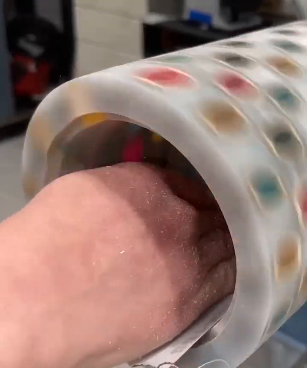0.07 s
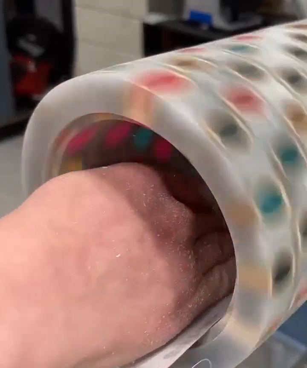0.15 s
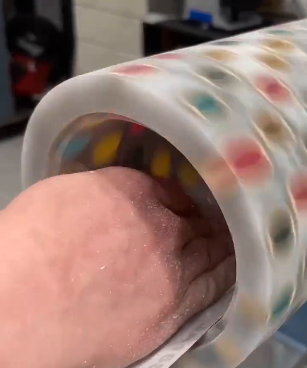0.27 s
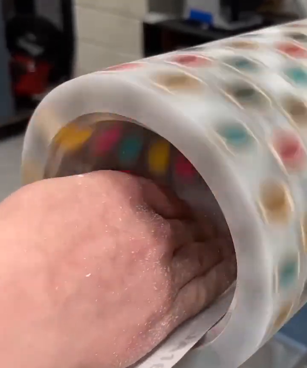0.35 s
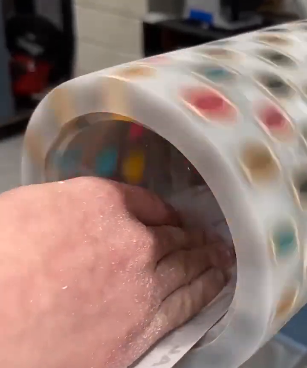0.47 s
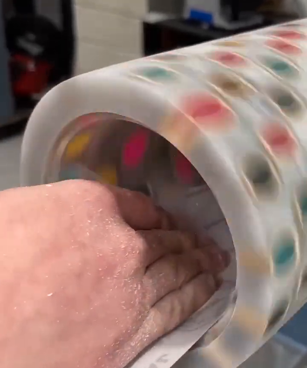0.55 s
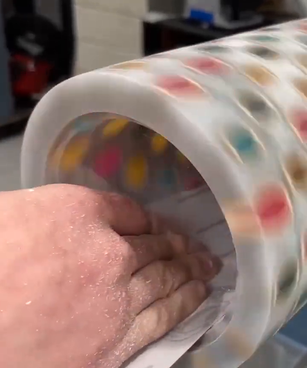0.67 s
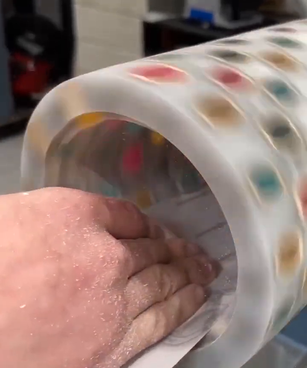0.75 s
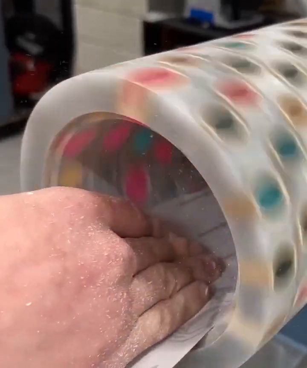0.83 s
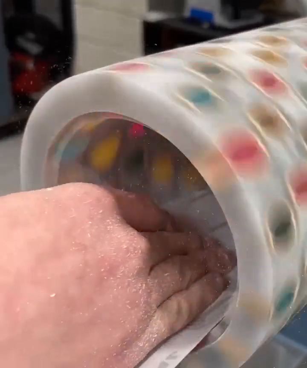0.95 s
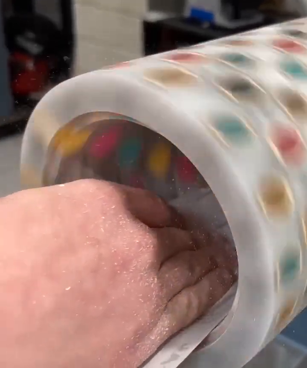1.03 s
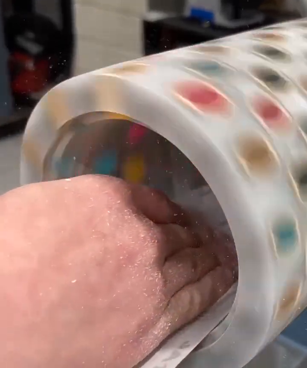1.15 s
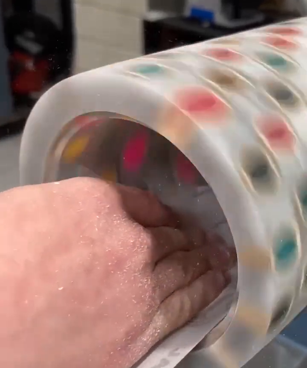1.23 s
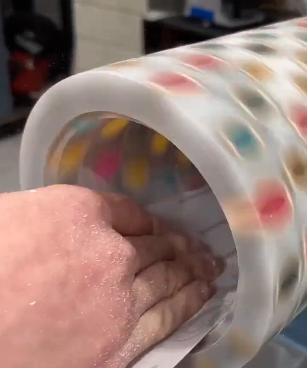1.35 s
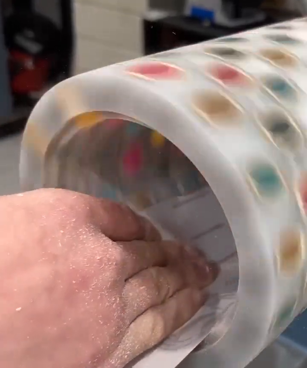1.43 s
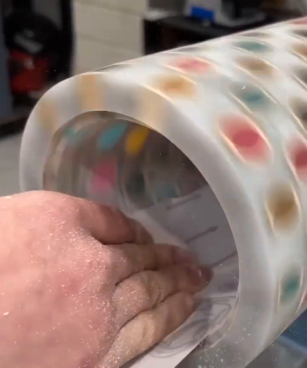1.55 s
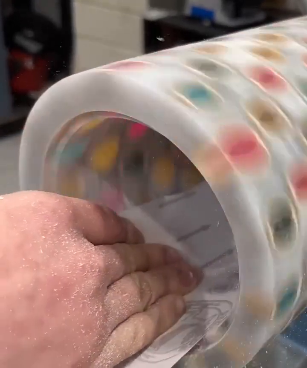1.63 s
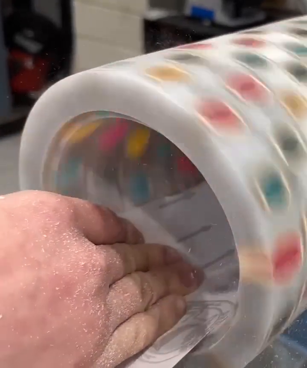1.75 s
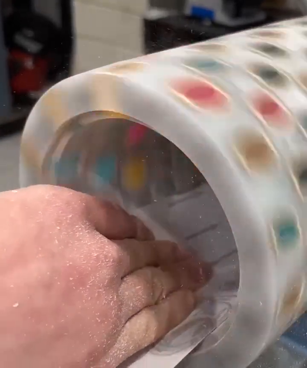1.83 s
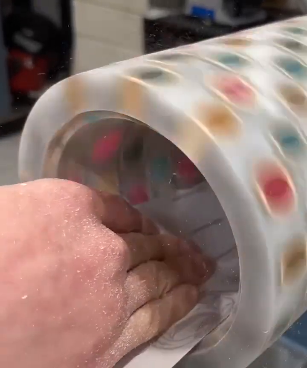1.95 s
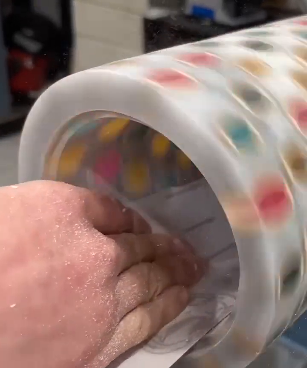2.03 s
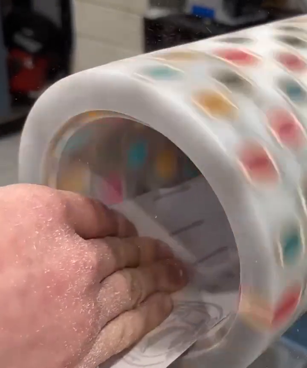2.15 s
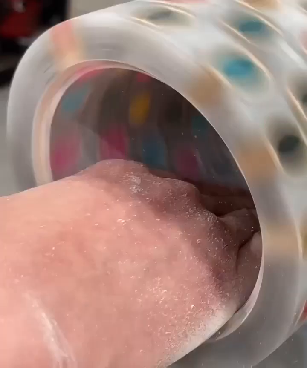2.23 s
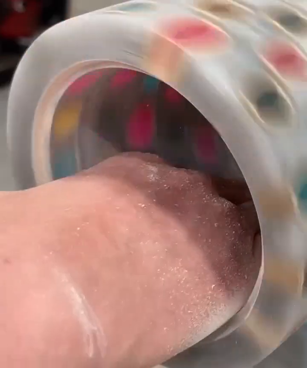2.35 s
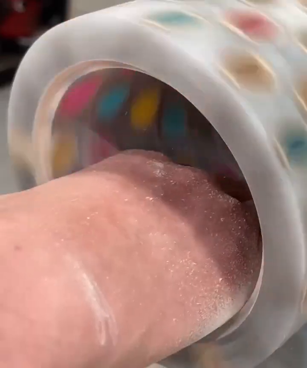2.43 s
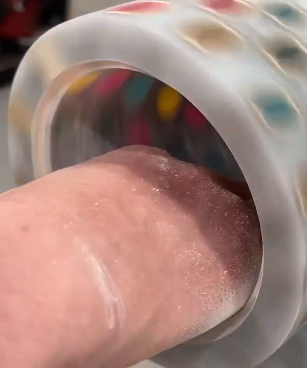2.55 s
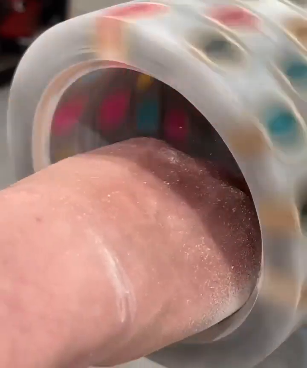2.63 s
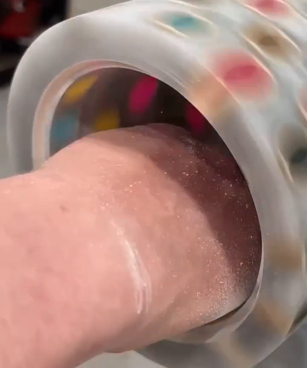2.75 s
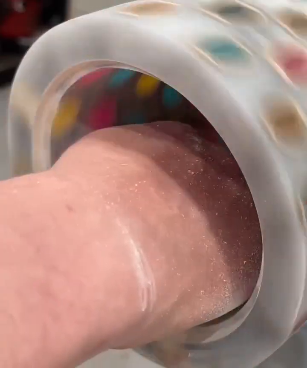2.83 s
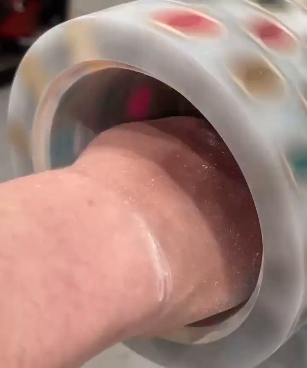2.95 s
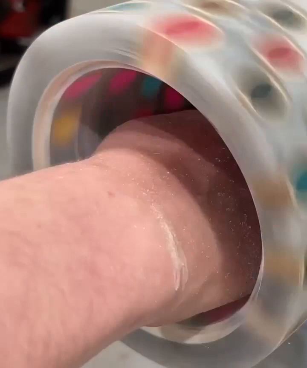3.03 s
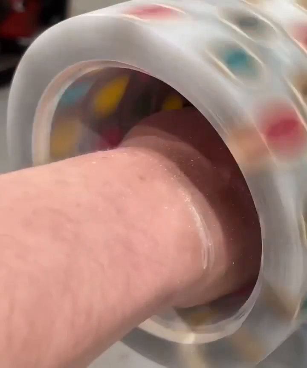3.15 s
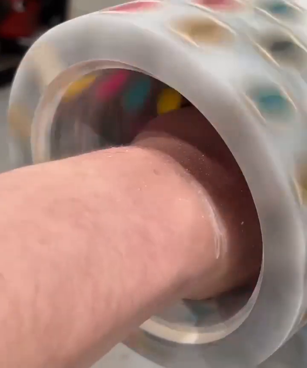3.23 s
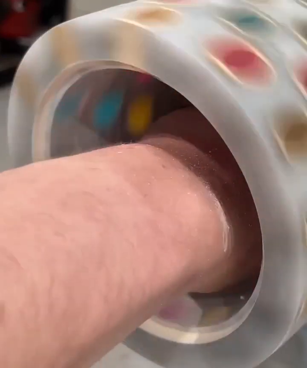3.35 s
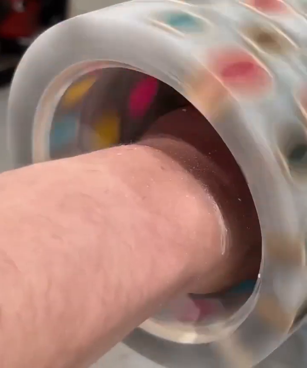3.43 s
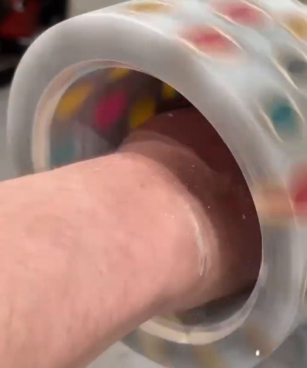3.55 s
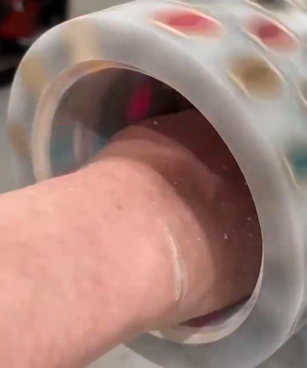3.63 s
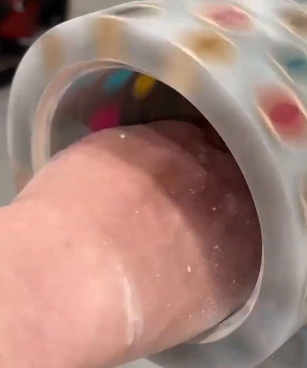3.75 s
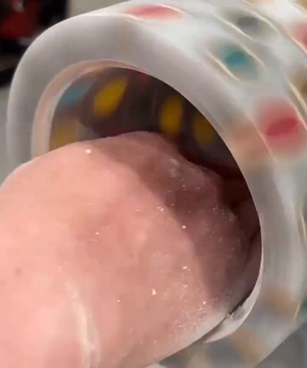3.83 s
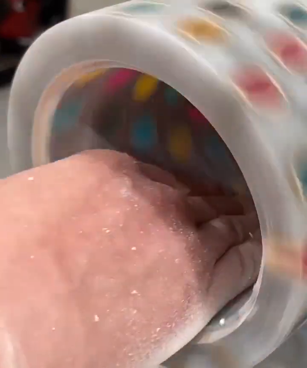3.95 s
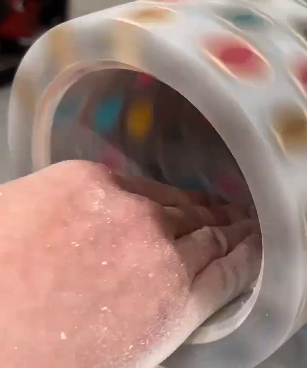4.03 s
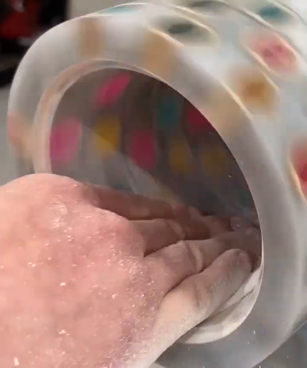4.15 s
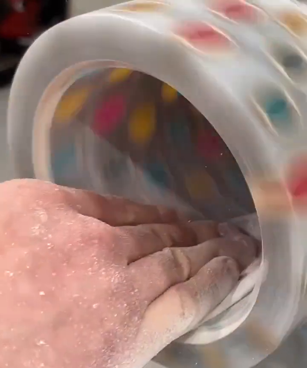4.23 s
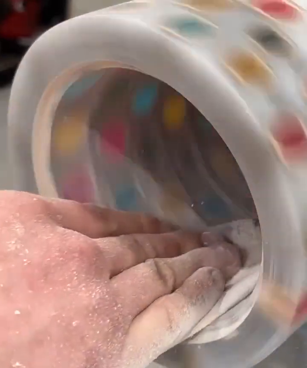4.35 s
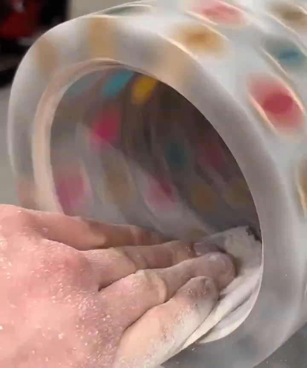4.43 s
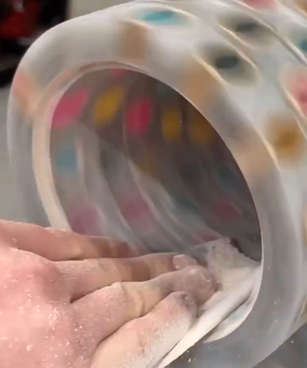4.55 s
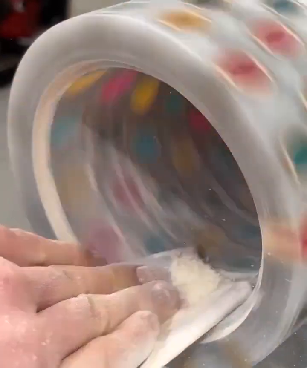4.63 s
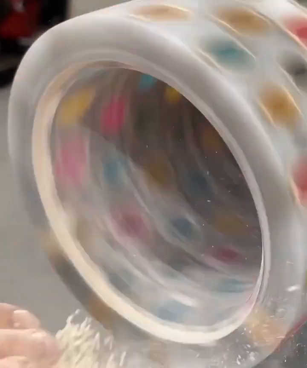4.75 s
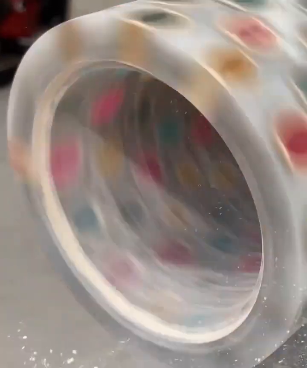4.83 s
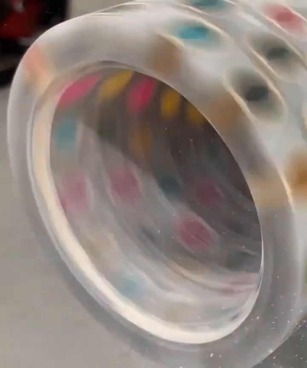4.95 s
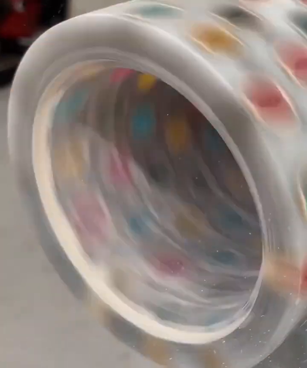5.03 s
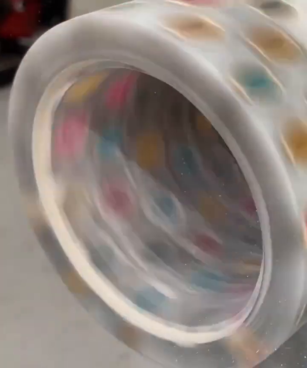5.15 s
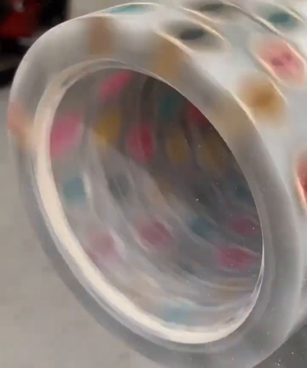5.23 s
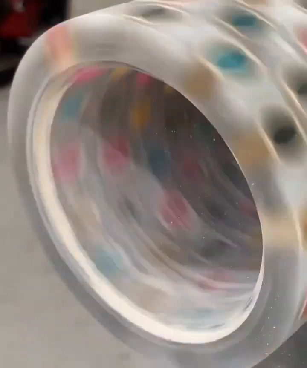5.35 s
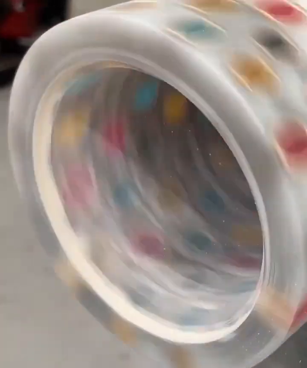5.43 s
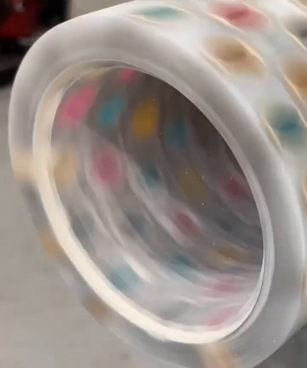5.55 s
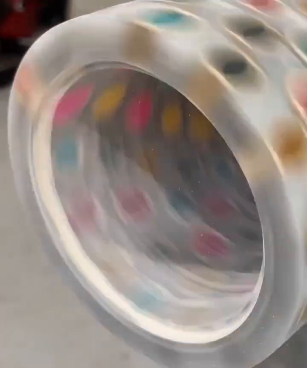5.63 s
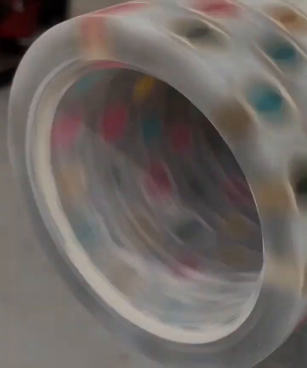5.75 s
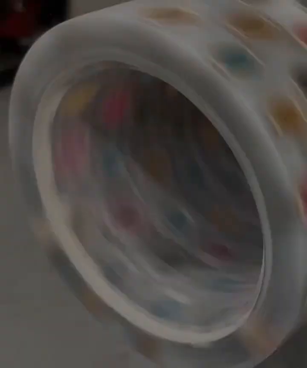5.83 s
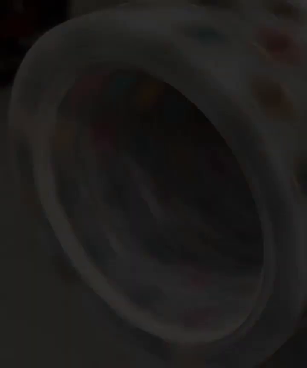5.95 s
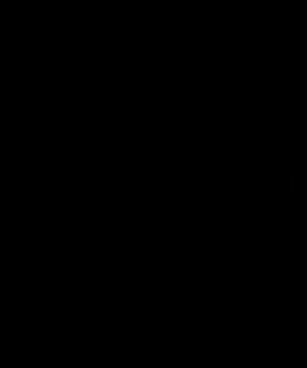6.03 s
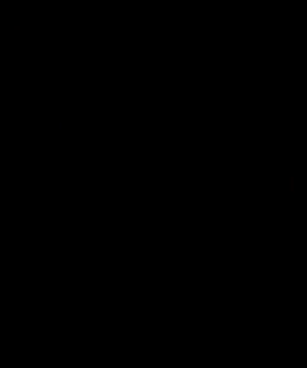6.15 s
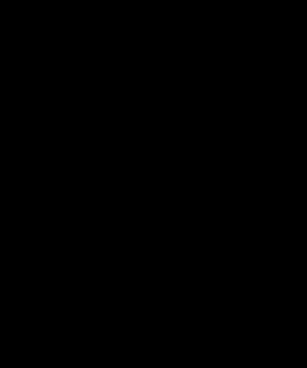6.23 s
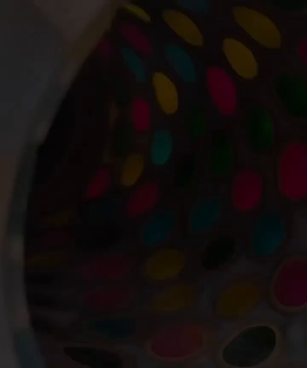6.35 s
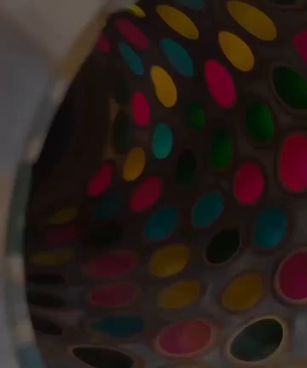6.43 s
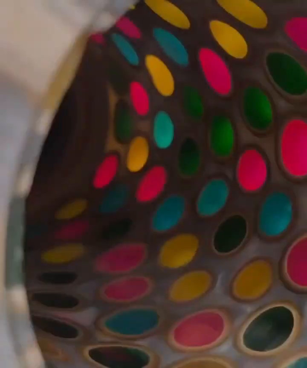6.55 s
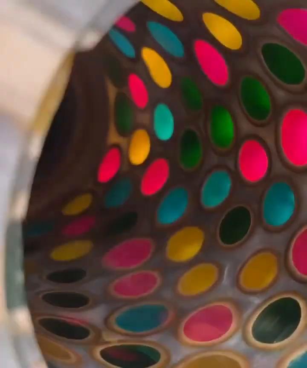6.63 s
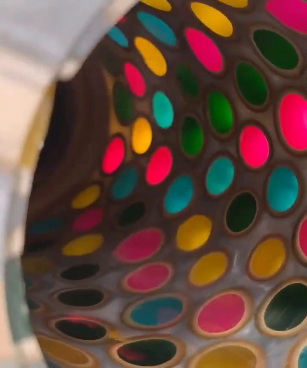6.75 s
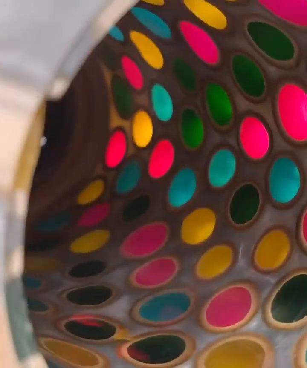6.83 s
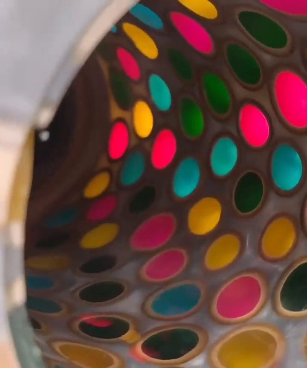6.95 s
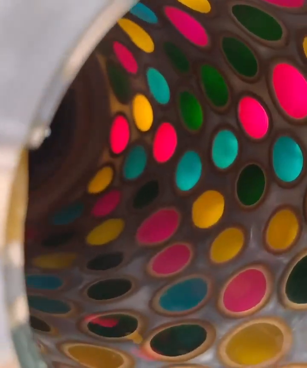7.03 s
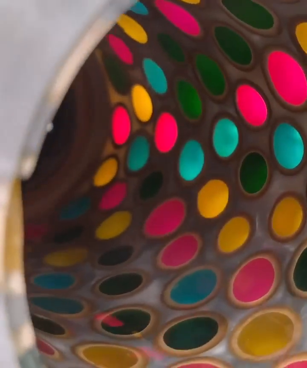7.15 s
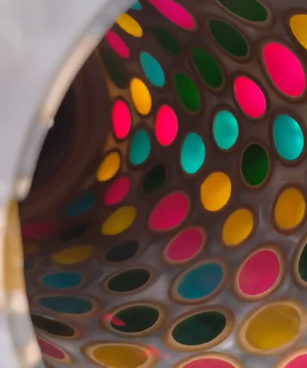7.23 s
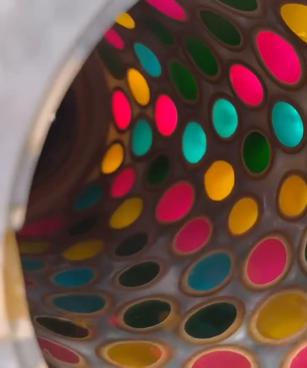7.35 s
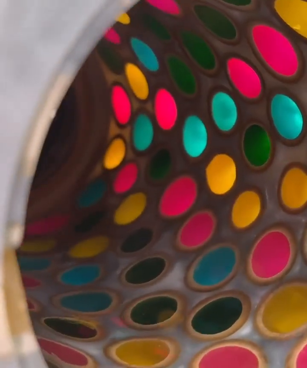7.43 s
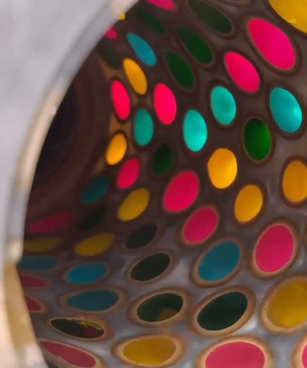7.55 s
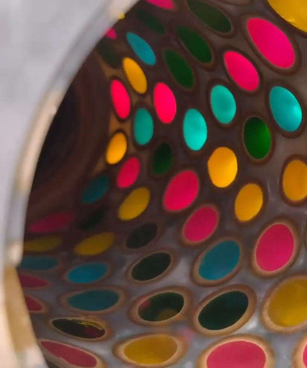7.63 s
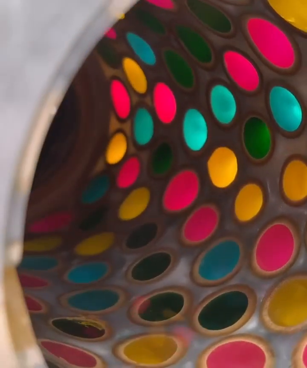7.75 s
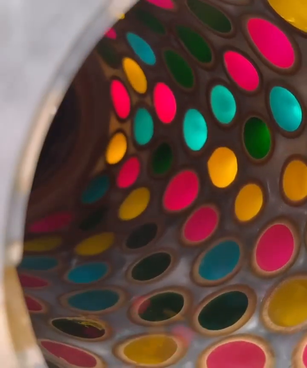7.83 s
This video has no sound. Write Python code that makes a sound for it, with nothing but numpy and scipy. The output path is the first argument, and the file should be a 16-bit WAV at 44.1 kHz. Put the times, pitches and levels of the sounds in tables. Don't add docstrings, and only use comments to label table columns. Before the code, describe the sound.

In a workshop, a hand rubs sandpaper inside a spinning hollow tube: continuous bright gritty hiss, shifting airy resonance, low wall ringing and spindle thrum. After nearly five seconds the paper snaps off the rim and the hiss cuts out. Motor hum and thin whine continue with soft rustles and ticks, then fade to room murmur and a faint far machine tone. Close stereo microphone.

```python
import sys
import numpy as np
from scipy import signal
from scipy.fft import rfft, irfft, next_fast_len
from scipy.io import wavfile
from scipy.ndimage import uniform_filter1d, map_coordinates

SR = 44100
rng = np.random.default_rng(int(sys.argv[2]) if len(sys.argv) > 2 else 0)


def put_to_file(sound):
    columns = np.atleast_2d(sound).T
    safe = np.clip(columns, -1, 1)
    whole_steps = np.round(safe * 32767)
    wavfile.write(sys.argv[1], SR, whole_steps.astype(np.int16))


def invert_db(x):
    u = np.asarray(x, float) / 20
    return 10 ** u


N = 347489

# (time [s], peak level [dB], frequency [Hz])
TICKS = [(5.341, -38, 4000), (5.4655, -33, 4500), (5.16, -40, 75), (5.185, -40, 70), (4.668, -38, 300),
         (4.698, -33, 330), (4.714, -33, 320), (4.728, -33, 300), (4.7445, -31, 340), (4.7563, -35, 340),
         (4.768, -38, 340), (4.66, -38, 900), (4.68, -37, 880), (4.698, -32, 830), (4.724, -33, 810),
         (4.74, -34, 900), (4.738, -36, 180), (4.738, -38, 480), (4.986, -47, 840), (4.998, -44, 890),
         (4.986, -46, 510), (5.012, -45, 760), (5.022, -45, 480), (5.026, -47, 720), (6.0, -50, 1150),
         (6.05, -45, 70), (6.43, -50, 60), (7.62, -52, 55), (6.093, -46, 4000), (6.175, -50, 4000),
         (6.258, -47, 4000), (6.298, -45, 4000), (6.32, -49, 4000), (6.378, -51, 4000)]
# (frequency [Hz], likeness [0..1])
ALIKE = [(60, .998), (150, .93), (290, .94), (480, .8), (800, .62), (1600, .25), (2300, .25), (2700, .62),
         (3050, .15), (3500, .2), (4300, .74), (5100, .76), (6300, .55), (7900, .7), (9800, .2),
         (11400, .4), (11900, .82), (12800, .78), (13500, .4), (15500, .7)]
# (frequency [Hz], likeness [0..1])
DIFFUSE = [(60, .998), (130, .95), (300, .75), (480, .42), (900, .15), (1400, .1), (15000, .1)]
# (frequency [Hz], left over right [dB])
SHELVES = [(2000, 0), (3500, 1.5), (5300, 6), (7000, 4), (8500, 0)]
# (start time [s], motor level [dB], far tone level [dB], left lag of far tone [samples])
SHOTS = [
    (0, -7, -65, -26),
    (2.28, 2, -57.5, -20),
    (4.78, 0, -54.5, -11.5),
    (6.43, -1, -53.5, 9.5),
]
LIFT_S = 4.735


def unit(x):
    return x / np.sqrt(np.mean(x ** 2) + 1e-20)


def along(points, hz):
    f, v = np.transpose(points)
    return np.interp(np.log(hz + 1), np.log(f + 1), v)


def curves(rows):
    s, *cols = np.transpose(rows)
    return [np.interp(np.arange(N) / SR, s, c) for c in cols]


def held(rows, glide_s):
    s, *cols = np.transpose(rows)
    row = np.searchsorted(s[1:], np.arange(N) / SR)
    return [uniform_filter1d(c[row], round(glide_s * SR), mode="nearest") for c in cols]


def swells(rows):
    t = np.arange(N) / SR
    return sum(db * np.exp(-((t - s) / half) ** 2) for s, db, half in rows)


def ramp(start, takes):
    return np.clip((np.arange(N) / SR - start) / takes, 0, 1)


def wobble(rate):
    return map_coordinates(rng.standard_normal(int(N * rate / SR) + 4), [np.arange(N) * rate / SR])


def filtered(x, response):
    m = next_fast_len(N + 8192)
    return irfft(rfft(x, m) * response(np.fft.rfftfreq(m, 1 / SR)), m)[..., :N]


def colour(spectrum):
    return lambda hz: invert_db(along(spectrum, hz)) * (hz > spectrum[0][0]) * (hz < spectrum[-1][0])


def modes(table):
    def response(f):
        return sum(invert_db(db) * (1j * f * w / (c * c - f * f + 1j * f * w)) ** 2 for c, w, db in table)
    return response


def noise(patchy_db, grain_db=0):
    z = signal.stft(rng.standard_normal((2, N)), nperseg=512)[2]
    field = uniform_filter1d(rng.standard_normal(z.shape[1:]), size=5, axis=0)
    field = uniform_filter1d(field, size=10, axis=1)
    pair = signal.istft(z * invert_db(patchy_db * unit(field)), nperseg=512)[1][:, :N]
    return pair * invert_db(grain_db * wobble(900))


def ports(pair, response, alike, near=0, lean=None):
    # (frequency [Hz], left lead [rad])
    lead = [(200, 0), (340, .1), (600, .7), (1000, 1.1), (1500, 1.2), (2700, 3), (4200, 6.7), (5300, 6.9),
            (6300, 6.9), (7600, 9.4), (8200, 9.4), (8900, 7.2), (11300, 6.2), (13500, 6.4), (14500, 7.1),
            (15300, 9.4)]
    # (frequency [Hz], left over right [dB])
    sideways = [(100, 0), (290, 1.3), (400, 2), (800, 7.5), (2100, 9.5), (2700, 6), (3200, 10), (3700, 10),
                (4300, 1.5), (5100, 1.5), (6000, 3.5), (8000, .5), (12000, 0)]
    m = next_fast_len(N + 8192)
    hz = np.fft.rfftfreq(m, 1 / SR)
    turn = np.arccos(np.clip(along(alike, hz), 0, 1)) / 2
    mid, side = rfft(pair, m) * (response(hz) * [np.cos(turn), np.sin(turn)])
    if lean is None:
        offset = invert_db(near * along(sideways, hz) / 2) * np.exp(.5j * near * along(lead, hz))
    else:
        offset = invert_db(near * along(lean, hz) / 2)
    both = irfft(np.array([(mid + side) * offset, (mid - side) / offset]), m)[:, :N]
    return both / np.sqrt(np.mean(both.mean(0) ** 2))


def tones(lines, drift_hz, waver_db):
    out = 0
    for hz, db in lines:
        level = np.sqrt(2) * invert_db(db + waver_db * wobble(29))
        phase = 2 * np.pi * np.cumsum(hz + drift_hz * wobble(9)) / SR
        out = out + level * np.sin(phase)
    return out


def lifted():
    drop_db, takes_s, fade_db_per_s = 17, 0.047, 150
    return -drop_db * ramp(LIFT_S, takes_s) - fade_db_per_s * ramp(LIFT_S + takes_s, 1)


def sanding():
    # (time [s], level [dB])
    hand = [(0.0, -22.5), (0.04, -24), (0.6, -24.5), (0.66, -23.5), (1.12, -25.5), (1.26, -25),
            (1.78, -24.5), (1.84, -25), (1.94, -23), (2.22, -25), (2.33, -26.5), (2.84, -28.5),
            (3.22, -25.5), (3.72, -26), (3.92, -25.5), (4.44, -26), (4.72, -31.5)]
    # (frequency [Hz], density [dB per Hz])
    grit_band = [(1500, -36), (2300, -6.5), (3100, -3.5), (4500, -3.5), (6500, -1), (8000, -2.5),
                 (9000, -25)]
    # (frequency [Hz], density [dB per Hz])
    sheen_band = [(7400, -63.5), (8300, 0.5), (9300, 1), (10400, -4.5), (11400, -8), (15000, -5),
                  (15900, -3.5)]
    # (frequency [Hz], density [dB per Hz])
    hollow_band = [(600, -29), (950, -13), (1150, -8), (1350, -8), (1700, -3), (2000, -2), (2200, -9),
                   (2600, -18.5), (3200, -30.5)]
    # (time [s], resonance [Hz], peak re hollow [dB], hollow level [dB])
    air = [(0, 1180, 5, -34.5), (.3, 1180, -5, -33), (.55, 1152, -26, -35), (1.05, 1158, -19.5, -34),
           (1.4, 1190, -19, -36.5), (1.46, 1440, -5.5, -37.5), (2.25, 1440, -3.5, -37.5),
           (2.32, 1540, -5.5, -35), (2.8, 1460, -11, -36.5), (3.0, 1045, -4, -36.5), (3.7, 1030, -10, -34),
           (4.05, 1610, -10, -36), (4.4, 1890, -13, -38.5), (4.75, 1810, -7.5, -39)]
    # (frequency [Hz], width [Hz], level [dB])
    bite_band = [(4920, 2000, 0)]
    # (start time [s], level re grit [dB])
    bites = [
        (0, -19.5),
        (.25, -15),
        (1.44, -12.5),
        (1.9, -9.5),
        (2.28, -23),
        (3.9, -12),
    ]
    # (frequency [Hz], width [Hz], level [dB])
    rim_band = [(2700, 1100, 0)]
    # (time [s], level [dB], half length [s])
    scrapes = [
        (.1, 2.5, 0.011),
        (.205, 2, 0.008),
        (.274, 3, .004),
        (1.385, 1.5, 0.0086),
        (1.955, 1.5, 0.016),
        (2.17, 0.5, 0.0072),
        (2.85, 2, 0.0085),
        (4.298, 1.5, 0.0074),
    ]
    # (time [s], level [dB], half length [s])
    dusty = [(.15, 1, 0.18), (.36, -1, .04), (.5, 1, .04), (.7, -0.5, 0.051), (.9, 1, .04), (1.1, -1, .1),
             (1.3, 1, .04), (1.55, -2, 0.039), (2.08, 1.5, .05), (2.45, -1, .04), (2.75, 2, .15),
             (3.05, -1, .04), (3.3, 1, .04), (3.5, 1, .04), (3.7, -1, 0.041), (3.95, 1, .04),
             (4.15, -1, .04), (4.4, 1, .04)]

    grit_db, = curves(hand)
    sheen_db = -28.5 + 0.51 * (grit_db + 24.5) + swells(dusty)
    sheen_db = sheen_db + 2 * ramp(2.83, 0.37)
    sheen_db = sheen_db - 9.5 * ramp(LIFT_S - .05, 0.042)
    air_hz, air_db, hollow_db = curves(air)
    judder = invert_db(0.28 * wobble(7.03) + swells(scrapes))

    scratch = noise(patchy_db=0.46, grain_db=1.0)
    grit = ports(scratch, colour(grit_band), ALIKE, near=0.9)
    bite_gain = invert_db(held(bites, glide_s=0.053)[0])
    grit = grit + bite_gain * ports(scratch, modes(bite_band), ALIKE, near=0.88)
    rim_gain = invert_db(-12.5) * ramp(4.3, 0.43)
    grit = grit + rim_gain * ports(scratch, modes(rim_band), ALIKE, near=0.92)
    sheen = ports(scratch, colour(sheen_band), ALIKE, near=0.94)
    hiss = invert_db(grit_db) * grit + invert_db(sheen_db) * sheen

    inside = noise(patchy_db=-1.0)
    hollow = ports(inside, colour(hollow_band), ALIKE, near=0.92)
    for centre in np.geomspace(950, 1900, 6):
        share = np.clip(1 - abs(np.log(air_hz / centre)) / 0.17, 0, 1)
        resonance = ports(inside, modes([(centre, 200, 0)]), ALIKE, near=0.84)
        hollow = hollow + invert_db(air_db) * share * resonance
    return judder * invert_db(lifted()) * (hiss + invert_db(hollow_db - 2) * hollow)


def tube():
    # (start time [s], wall ring level [dB], spindle thrum level [dB], rub
    # level [dB], shell ring level [dB], wall note [Hz])
    stages = [
        (0, -35, -50.5, -49.5, -33, 286.2),
        (.12, -33.5, -49.5, -50, -36.5, 286),
        (.3, -34.5, -52.5, -45, -37.5, 287),
        (.5, -34.5, -54, -43.5, -40, 286.7),
        (1.0, -36, -52, -45, -40, 288.4),
        (1.44, -39.5, -51.5, -46.5, -46.5, 289),
        (2.28, -47.5, -46, -56.5, -46, 290),
        (3.95, -47.5, -42, -53.5, -48, 290),
    ]
    # (time [s], level [dB], half length [s])
    sings = [(.02, 3, .02), (.06, -3.5, .02), (.12, 2.5, .035), (.18, -2.5, .02), (.29, -4.5, .04),
             (.4, 4.5, .035), (.46, -7, .02), (.5, 3, .02), (.59, -1.5, 0.054), (.71, 2.5, .03),
             (.84, 3, 0.043), (.9, -5, .02), (.94, 3, .02), (1.06, -2, .025), (1.18, 0, .02),
             (1.22, -4, .02), (1.3, 6, .03), (1.38, 4.5, .04), (1.51, 5.5, 0.056), (1.58, -2, .02),
             (1.63, 2, .03), (1.73, -4.5, 0.044), (1.87, -6, .02), (1.96, 8.5, 0.078), (2.17, -6, 0.038),
             (2.3, -5.5, 0.056), (2.52, 6, 0.12), (2.62, 4.5, 0.034), (2.77, 4, 0.029), (3.06, 4.5, 0.094),
             (3.27, -3.5, .03), (3.72, 5.5, 0.045), (3.83, -6, 0.032), (3.97, 5, 0.045), (4.2, -5, .08),
             (4.33, 3.5, .03), (4.65, 3.5, 0.043)]
    # (time [s], level [dB], half length [s])
    lurches = [(.46, 7.5, 0.12), (.67, -8.5, .04), (1.15, 9.5, .1), (1.55, 5, .06), (2.32, 6, .04),
               (2.5, 5.5, 0.12), (2.84, 4, .04), (3.02, 3, .03), (3.12, 4.5, .03), (3.3, 2, 0.09),
               (3.67, 6, 0.036), (3.82, 5.5, 0.037), (4.05, -7, .06), (4.22, -1, .04), (4.55, 1, .1),
               (4.68, -10, 0.032)]
    # (frequency [Hz], width [Hz], level [dB])
    wall_modes = [(283.6, 17.5, -5.5), (303.3, 34.6, -1.5)]
    # (frequency [Hz], width [Hz], level [dB])
    shell_modes = [(860, 100, -2), (925, 60, -1), (1100, 50, -8), (1212, 35, -5)]
    # (frequency [Hz], width [Hz], level [dB])
    spindle_modes = [(98.8, 14, -0.5), (116, 16, 0)]
    # (frequency [Hz], density [dB per Hz])
    rub_band = [(25, -37), (60, -5.5), (140, -3.5), (220, 0), (500, -1), (750, 0), (1000, -11.5)]

    ring_db, thrum_db, rub_db, shell_db, note_hz = held(stages, glide_s=.06)
    jolt = swells([(4.745, 1, 0.03)])
    ring_db = ring_db + swells(sings) + 5 * jolt
    thrum_db = thrum_db + swells(lurches)

    steady = np.clip((ring_db + 50) / 10, .5, 1)
    note = invert_db([[.6], [-.6]]) * tones([(note_hz, -3.0)], drift_hz=5.5, waver_db=1.3)
    ring = steady * note + 0.46 * ports(noise(patchy_db=-3.5), modes(wall_modes), ALIKE, near=1.0)
    ring = invert_db(ring_db) * ring
    shell = ports(noise(patchy_db=-2.5), modes(shell_modes), ALIKE, near=0.81)
    shell = invert_db(shell_db + 8 * jolt) * shell

    shake = tones([(96.5, 0.0026)], drift_hz=1.54, waver_db=1.0)
    shake = shake + tones([(117, -8.5)], drift_hz=6, waver_db=5.0)
    shake = shake + 0.51 * ports(noise(patchy_db=-3.5), modes(spindle_modes), ALIKE)
    thrum = invert_db(thrum_db - 3.0 - 3 * ramp(LIFT_S, 0.045)) * (1 - ramp(LIFT_S, 0.27)) * shake

    rub = ports(noise(patchy_db=1.5), colour(rub_band), ALIKE, near=0.9)
    rub = invert_db(rub_db + 2.5 + 10 * jolt) * rub
    return invert_db(lifted()) * (ring + shell + rub) + thrum


def motor():
    # (frequency [Hz], rms level [dB])
    orders = [(70.0, -62), (177.6, -61.5), (266.4, -55.5)]
    # (frequency [Hz], rms level [dB])
    whine_lines = [(6724, -82.5), (6812, -85.5), (6988, -77.5), (7079, -73.5), (7289, -79.5),
                   (14061, -68.5), (14223, -79.5), (14312, -83), (14492, -72), (14579, -81.5)]
    # (frequency [Hz], density [dB per Hz])
    drone_band = [(25, -12), (65, -4), (130, -6), (300, -11), (700, -18.5), (1100, -12), (1800, -12.5),
                  (2700, -20.5), (3300, -31), (6500, -31.5), (10500, -37.5), (11800, -48.5), (13200, -50)]
    # (frequency [Hz], density [dB per Hz])
    fizz_band = [(6500, -40.5), (6750, -11), (7200, -7), (7400, -42.5), (13300, -41), (13500, -13.5),
                 (13800, -4), (14550, -1), (14750, -29)]

    drone = ports(noise(patchy_db=1.5), colour(drone_band), DIFFUSE, near=1, lean=SHELVES)
    drone = invert_db(-54.5) * drone
    fizz = invert_db(-64.0) * ports(noise(patchy_db=2.0), colour(fizz_band), DIFFUSE)
    whine = tones(whine_lines, drift_hz=3, waver_db=-1.5)
    whine = np.array([whine, np.roll(whine, 1)])

    hum = tones(orders[:1], drift_hz=2.1, waver_db=4.0) + tones(orders[1:2], drift_hz=1.9, waver_db=2.0)
    throb_hz, throb_depth, dip_s = 7.35, .6, 5.19
    beat = np.cos(np.pi * throb_hz * (np.arange(N) / SR - dip_s)) ** 6
    third = tones(orders[2:], drift_hz=1.2, waver_db=.8) * invert_db([[-.5], [5]])
    hum = hum + third * (1 - throb_depth * beat)

    fade = 1 - .99 * ramp(6.06, 0.57)
    thin = fade ** 0.55 * (fizz + invert_db(4.0) * whine)
    return invert_db(held(SHOTS, glide_s=.06)[0]) * fade ** 1.4 * (drone + thin + hum)


def shop():
    # (frequency [Hz], density [dB per Hz])
    still_band = [(25, -1), (70, 0), (200, -7), (450, -11.5), (650, -3), (900, -14.5), (1230, -9),
                  (1850, -12.5), (2300, -20.5), (2900, -21), (6200, -25.5), (8000, -30.5), (10500, -40),
                  (12500, -50), (15300, -56)]
    # (frequency [Hz], level [dB])
    overtones = [
        (1241, -12),
        (802, -21),
    ]
    # (frequency [Hz], width [Hz], level [dB])
    fuzz_modes = [(1190, 20, 0), (686, 20, -3)]
    # (time [s], level [dB], half length [s])
    sags = [
        (6.2, -0.5, .15),
        (6.14, -4, .04),
        (6.5, -5, .1),
        (6.8, -8, .06),
        (7, -1.5, .12),
    ]
    # (time [s], level [dB], half length [s])
    drifts = [
        (4.95, 0.5, .2),
        (5.45, -3, 0.11),
        (5.75, 0.5, 0.099),
        (6.3, -3, 0.26),
        (6.75, -2.5, 0.22),
        (7.4, -1.5, 0.4),
    ]

    _, tone_db, lag = held(SHOTS, glide_s=0.072)
    note = tones([(620.7, .6)], drift_hz=0.86, waver_db=0.8) * invert_db(swells(sags))
    fuzz = unit(filtered(noise(patchy_db=2.5)[0], modes(fuzz_modes)))
    upper = tones(overtones, drift_hz=1.3, waver_db=1.6) + invert_db(-13.5) * fuzz
    lean = invert_db(4 * ramp(6.4, .3))
    left = np.interp(np.arange(N) - lag, np.arange(N), note + lean * upper)
    left = invert_db(2.5 + swells(drifts)) * left
    song = invert_db(tone_db) * np.array([left, note + upper / lean])

    murmur = ports(noise(patchy_db=1.2), colour(still_band), DIFFUSE, near=1, lean=SHELVES)
    return song + invert_db(-58.5) * ramp(6.0, 0.12) * murmur


def rustling():
    # (time [s], peak level [dB], decay [s], crispness [dB])
    rustles = [(4.8, -48, 0.054, -14), (4.936, -58, 0.033, -7), (5.03, -52.5, 0.055, -8),
               (5.15, -59.5, 0.12, -15), (5.341, -60, .012, -18), (5.37, -64, 0.05, -10),
               (5.467, -56, 0.0047, -6), (5.48, -64, 0.066, -14), (5.61, -59, .05, -7),
               (5.71, -64, .04, -10), (5.8, -63, .02, -12), (5.99, -55, 0.044, -16), (6.09, -54, 0.06, -12),
               (6.17, -64, 0.06, -16), (6.25, -57, .03, -8), (6.3, -59, 0.044, -11),
               (6.388, -68, 0.025, 3.5)]
    t, body, crisp = np.arange(N) / SR, 0, 0
    for s, db, decay, crisp_db in rustles:
        swell = invert_db(db) * np.exp(-abs(t - s) / np.where(t < s, 0.66 * decay, decay))
        body = body + swell
        crisp = crisp + invert_db(crisp_db) * swell
    return body, crisp


def handling():
    # (frequency [Hz], density [dB per Hz])
    paper_band = [(300, -8), (800, 3), (2500, -3.5), (7000, -8), (8000, -12)]
    level, crisp = rustling()
    crumple = noise(patchy_db=0.5, grain_db=2.0)
    out = level * ports(crumple, colour(paper_band), DIFFUSE)
    out = out + crisp * ports(crumple, colour([(8000, 3), (13300, -6)]), DIFFUSE)

    snap = signal.butter(2, [1800, 8000], "bandpass", fs=SR, output="sos")
    t = np.arange(SR // 10) / SR
    for s, db, hz in TICKS:
        life = .004 + 6 / hz + .02 * (hz < 2000)
        crackle = np.clip(hz / 4000, 0, 1)
        burst = signal.sosfilt(snap, rng.standard_normal((2, len(t))))
        tick = (1 - crackle) * np.sin(2 * np.pi * hz * t) + crackle * burst
        out[:, round(s * SR):][:, :len(t)] += invert_db(db - 26 * t / life) * tick

    u = np.arange(SR // 100) / SR / .0003
    out[:, round(4.7445 * SR):][:, :len(u)] += invert_db(-22) * (1 - u) * np.exp(-u)
    return out


def scene():
    return sanding() + tube() + motor() + shop() + handling()


def starved(x):
    # (frequency [Hz], share)
    coarse = [(1100, 0), (1300, 1), (1800, 1), (2000, 1.15), (2700, 1.25), (3400, 1.15), (4600, 1.2),
              (5000, .9), (15000, .9)]
    # (low edge [Hz], high edge [Hz])
    thin_bands = [(7580, 8230), (15090, 16100)]
    # (start time [s], end time [s])
    spared_spells = [(.69, .8), (1.4, 1.6), (1.63, 1.87), (2.0, 2.07), (2.17, 2.29), (2.68, 2.86),
                     (2.9, 2.97), (3.76, 3.83), (3.96, 4.1), (4.42, 4.51), (4.64, 4.89), (5.0, 5.21),
                     (5.25, 5.4), (5.44, 5.75), (5.97, 6.47), (6.67, 6.72), (7.44, 7.54)]
    margin_db, chance_db, streak_db, faint_db, hush_db = 8, 2.7, 3, -4, -103

    frame = dict(window=np.sin(np.pi * (np.arange(2048) + .5) / 2048), nperseg=2048)
    hz, t, z = signal.stft(np.array([x[0] + x[1], x[0] - x[1]]) / 2, SR, **frame)
    band = np.searchsorted(np.r_[110, 200, np.geomspace(700, 16000, 44)], hz)
    level = np.array([[np.mean(abs(c[band == b]) ** 2, 0) for b in range(band.max() + 1)] for c in z])
    level = 10 * np.log10(uniform_filter1d(level, size=3, axis=2) + 1e-30)

    luck = unit(uniform_filter1d(rng.standard_normal(level.shape), size=3, axis=2))
    kept = (level - level[::-1] + chance_db * luck > -margin_db)[:, band]
    kept |= ((hz > 100) & (hz < 1600))[:, None]
    kept |= ((hz > 13400) & (hz < 14700))[:, None] & (t > 4.8) & (t < 6.5)
    thin = np.any([(hz > lo) & (hz < hi) for lo, hi in thin_bands], 0)
    spared = np.any([(t > a) & (t < b) for a, b in spared_spells], 0)
    kept[0][thin] = spared & (hz[thin] < 15720)[:, None]

    share = along(coarse, hz)[:, None]
    streaks = unit(uniform_filter1d(rng.standard_normal(z.shape), size=3, axis=2)) * share
    sudden = np.any([abs(t - s) < .03 for s, db, pitch in TICKS if pitch > 2000 and db > -40], 0)
    streaks[..., sudden] = 0
    z = z * invert_db(streak_db * streaks - 0.08 * (streak_db * share) ** 2)

    patch = uniform_filter1d(uniform_filter1d(abs(z) ** 2, size=5, axis=1), size=3, axis=2)
    around = uniform_filter1d(patch, size=40, axis=1)
    extra_db = ((hz > 2100) & (hz < 4700))[:, None] * np.where(t < 6.4, 1.2, .6)
    kept &= (patch > invert_db(faint_db + extra_db) ** 2 * around) | (hz < 1600)[:, None]
    kept &= (patch > invert_db(hush_db) ** 2) | ((hz < 11500) | (hz > 13400))[:, None] | (t > 6.5)
    kept[..., sudden] |= (hz < 15720)[:, None]
    mid, side = signal.istft(z * kept, SR, **frame)[1][:, :N]
    return np.array([mid + side, mid - side])


def band_limit(x):
    return signal.sosfilt(signal.butter(12, 15800, fs=SR, output="sos"), x)


def record(dry):
    heard = filtered(dry, lambda hz: (1j * hz / (35 + 1j * hz)) ** 2 * (hz < 15780))
    mix = starved(heard)
    return band_limit(mix)


dry = scene()
out = record(dry)
put_to_file(out)
```